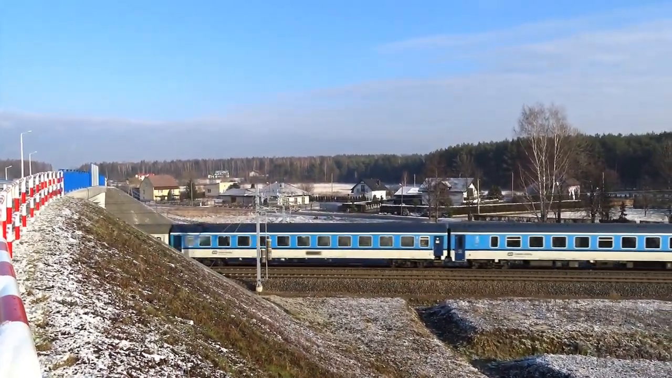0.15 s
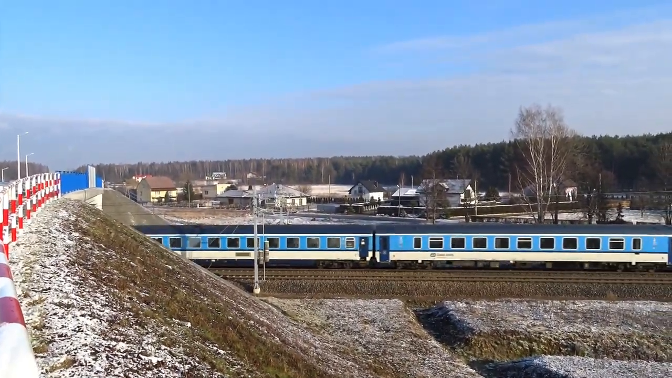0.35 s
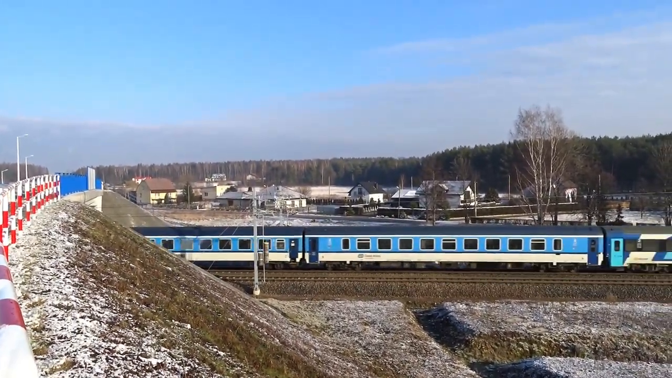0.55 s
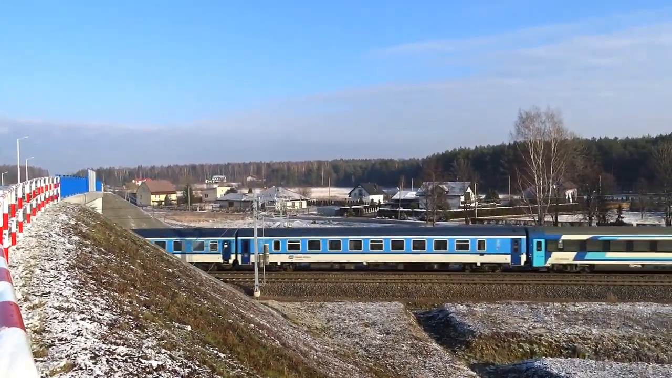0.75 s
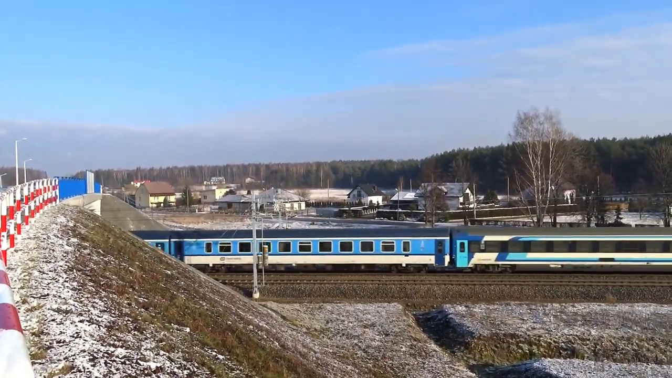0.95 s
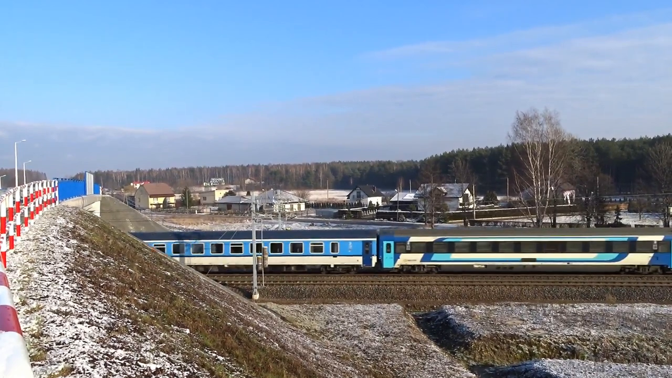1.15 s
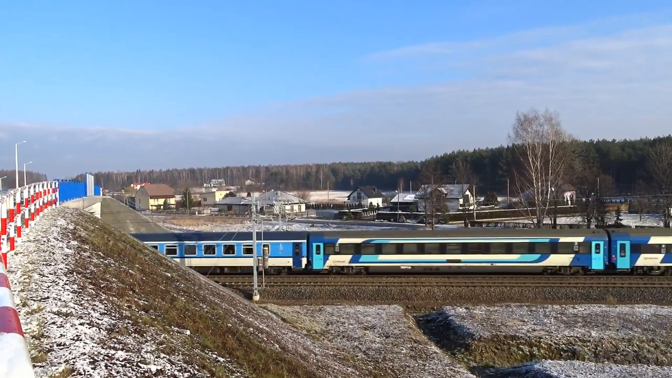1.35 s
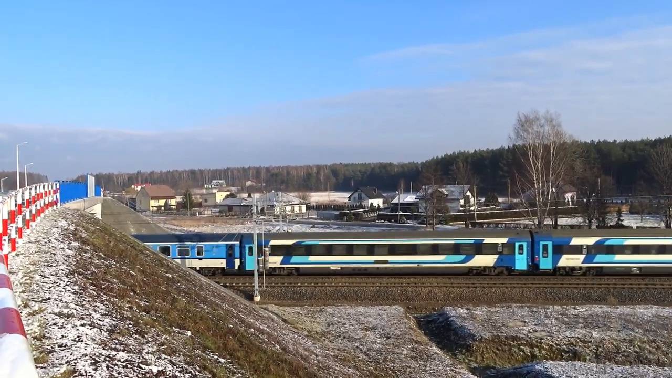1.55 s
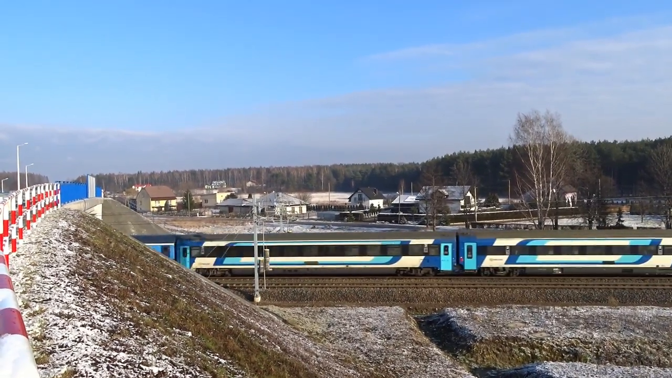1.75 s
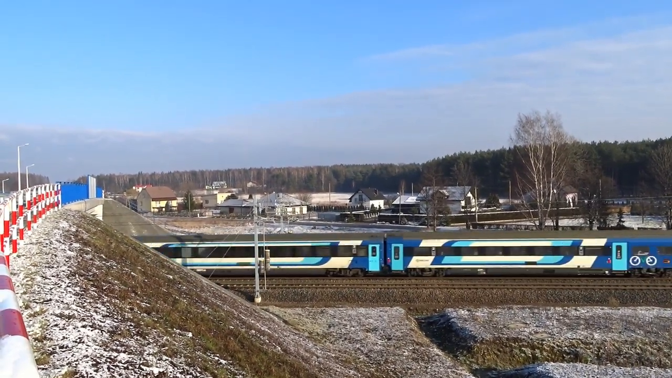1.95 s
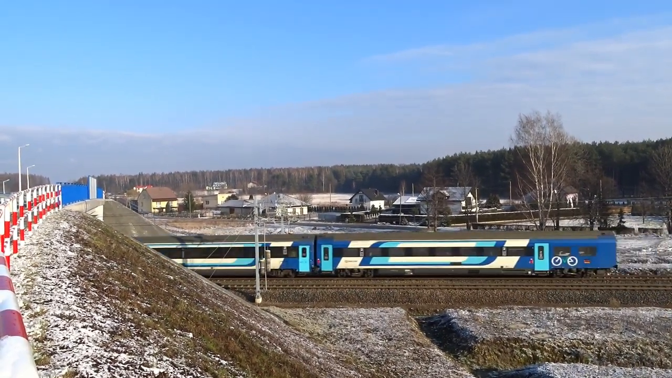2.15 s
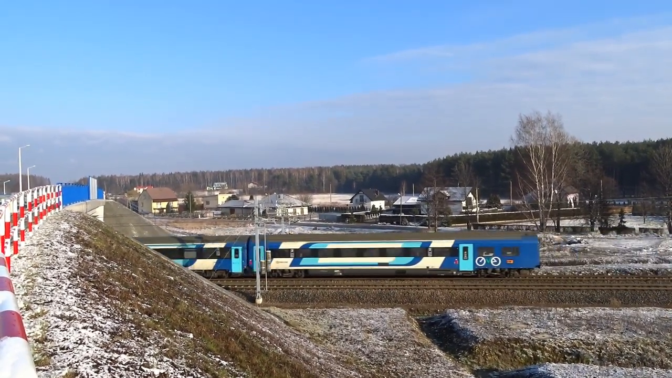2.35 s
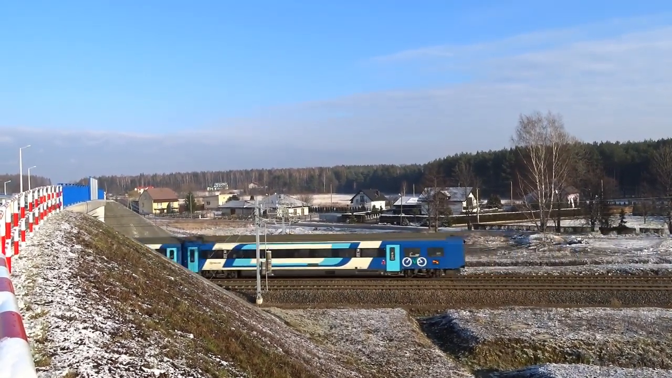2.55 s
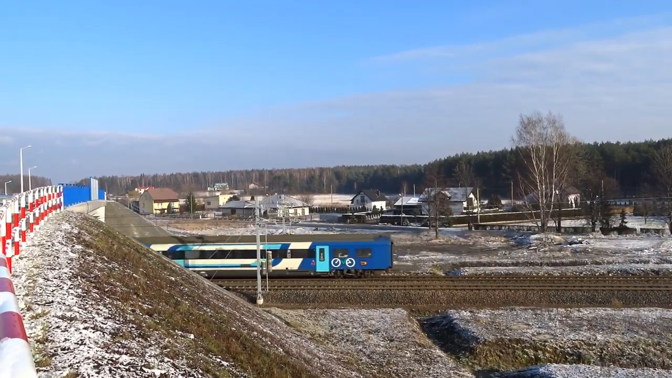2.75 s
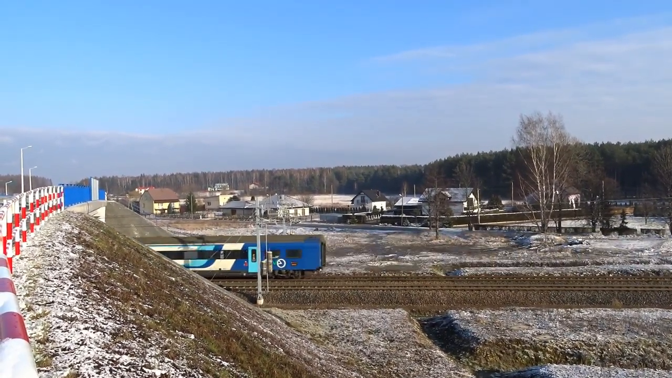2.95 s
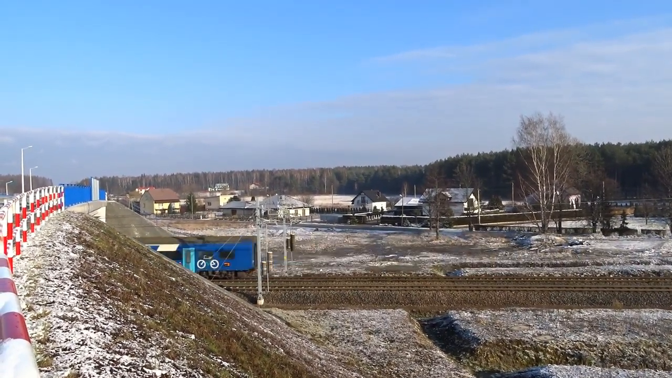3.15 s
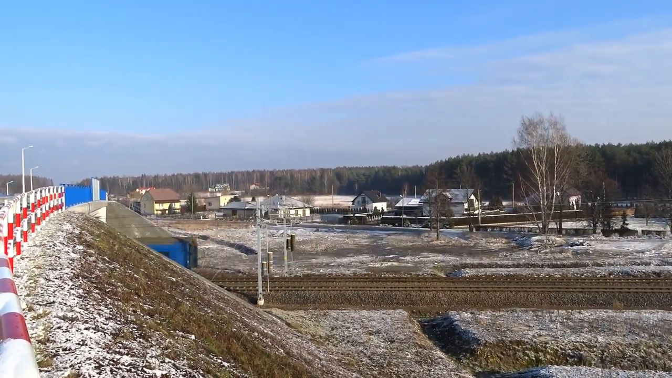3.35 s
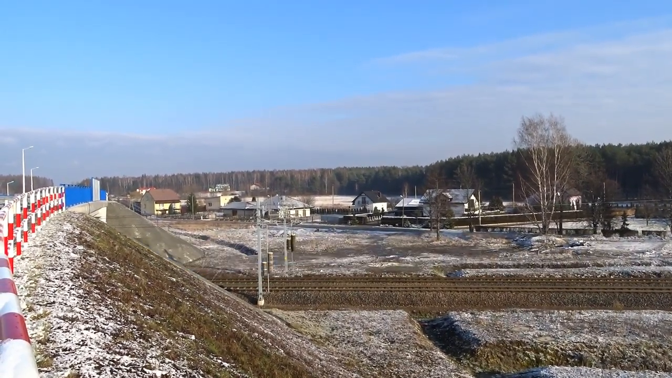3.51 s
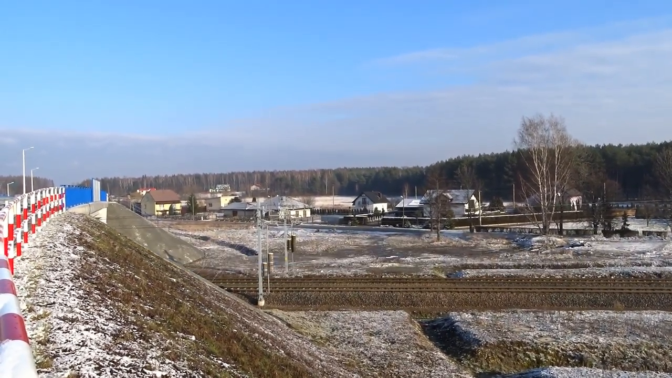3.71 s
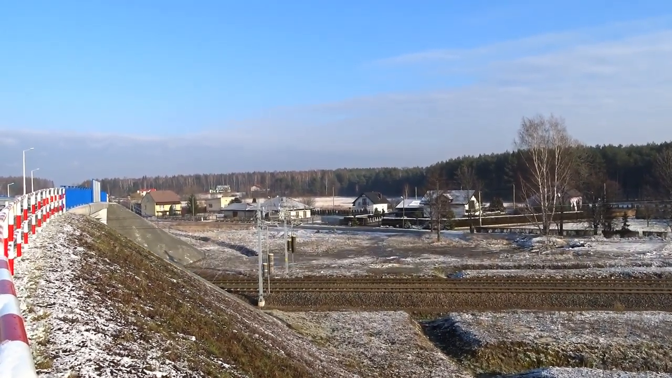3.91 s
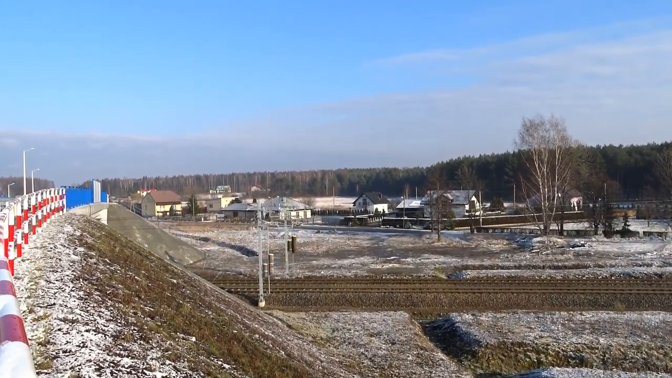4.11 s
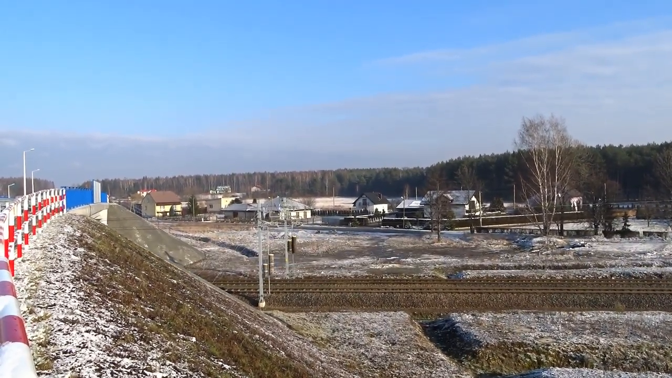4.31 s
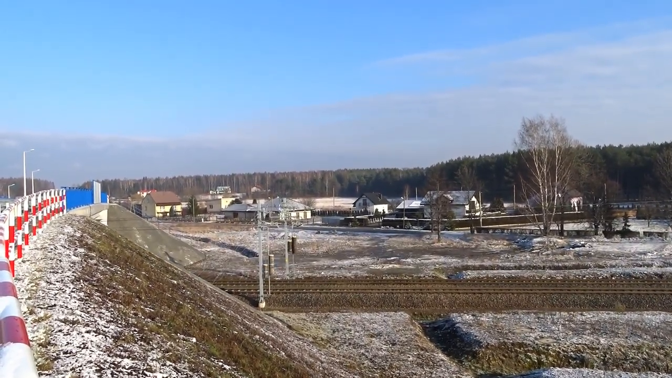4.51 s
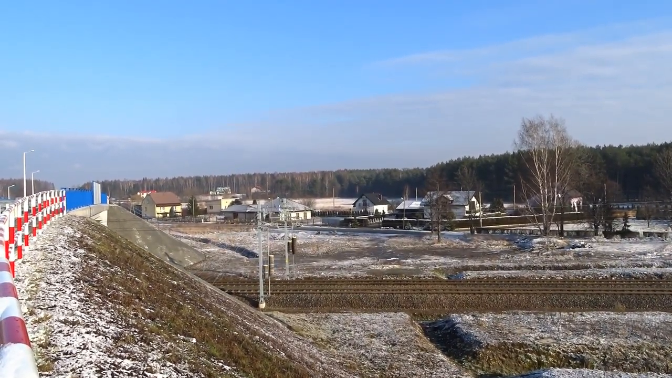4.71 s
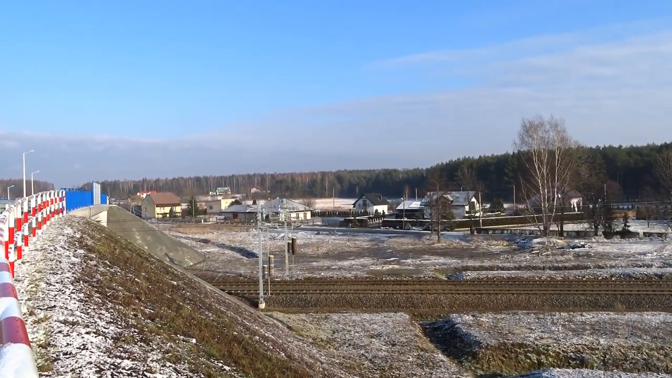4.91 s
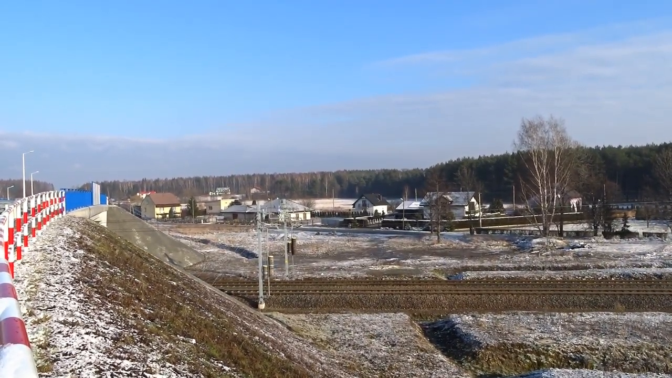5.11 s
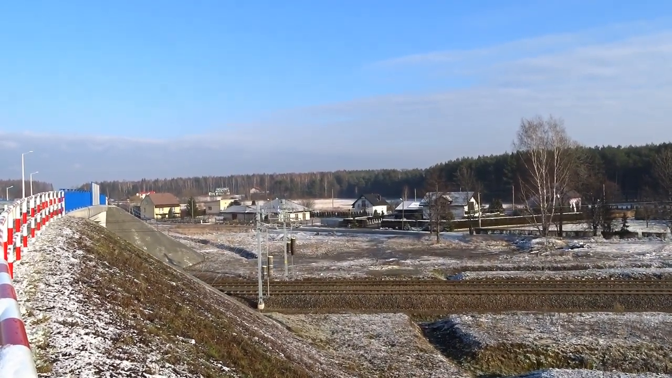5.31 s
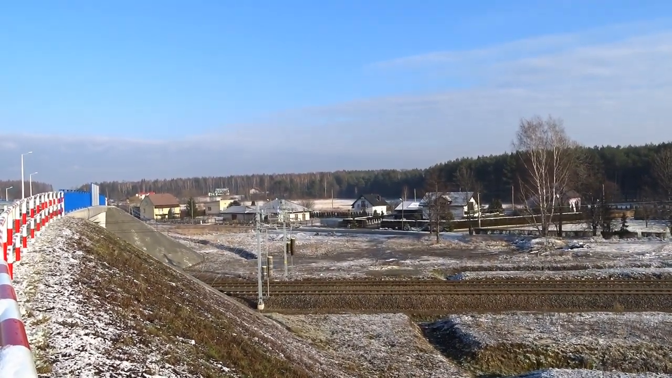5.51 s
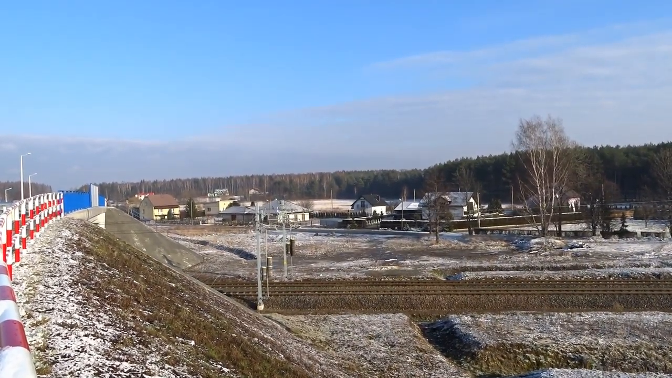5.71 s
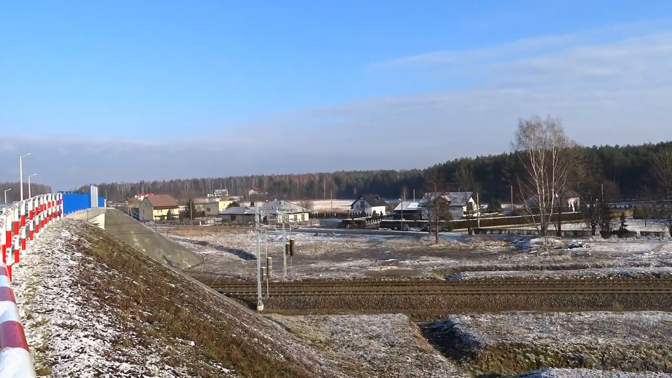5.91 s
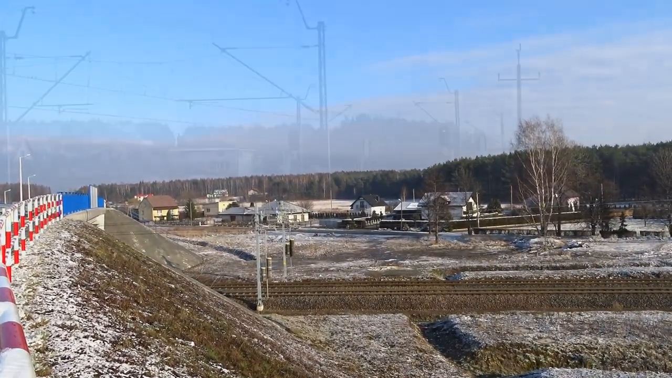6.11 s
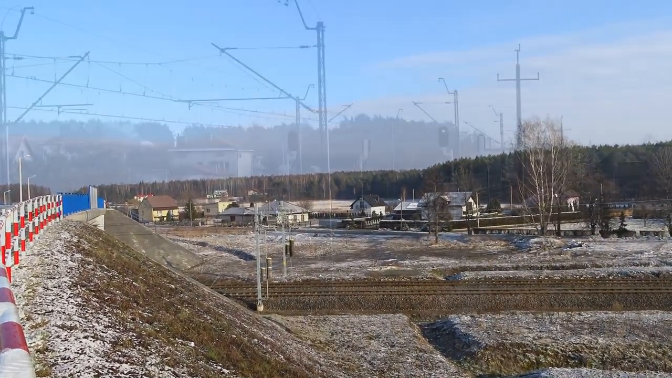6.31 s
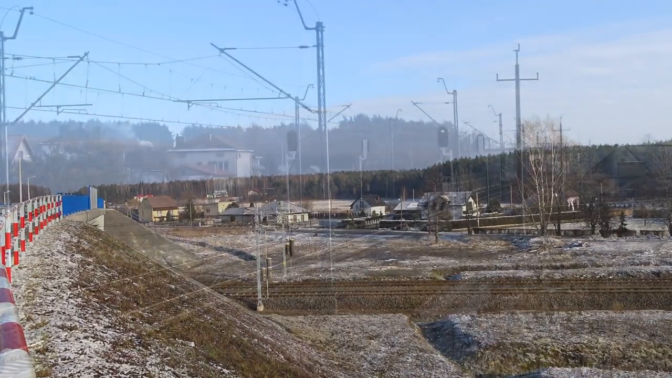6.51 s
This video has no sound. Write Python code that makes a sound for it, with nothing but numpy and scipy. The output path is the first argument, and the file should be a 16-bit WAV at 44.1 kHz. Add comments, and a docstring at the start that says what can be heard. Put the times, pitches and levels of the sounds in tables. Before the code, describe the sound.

Rough rolling roar of passing train coaches, wheels ringing and sinking in pitch, cuts to a dull distant wash with faintly singing rails.

```python
"""Express train passing below an embankment

The coaches of an express run past, right to left, and vanish behind a road bridge.
Rough steel roars (shaped noise); the wheels ring (resonant noise, sharp steel modes) and sink in
pitch as each bogie goes by; single wheels hum and howl (wavering tones).
Behind the last coach a dull wash recedes while the rails sing on in flares (narrow noise bands).
A few faint ticks and scuffs (noise bursts) sound near the microphone."""
import sys
import numpy as np
from scipy import signal
from scipy.fft import rfft, irfft, next_fast_len
from scipy.io import wavfile
from scipy.ndimage import uniform_filter1d, map_coordinates

SR = 44100
rng = np.random.default_rng(int(sys.argv[2]) if len(sys.argv) > 2 else 0)


def unload_wav(signal):
    """Save mono or channel-first audio to the path in sys.argv[1] as 16-bit WAV at rate SR, clipped to [-1, 1]."""
    wavfile.write(
        sys.argv[1],
        SR,
        np.round(np.clip(np.atleast_2d(signal).T, -1, 1) * 32767).astype(np.int16),
    )


N = 289320
T = np.arange(N) / SR
FRAME = 2048
HOP = FRAME // 4
HZ = np.fft.rfftfreq(FRAME, 1 / SR)
TIMES = np.arange(N // HOP + 3) * HOP / SR
GONE_S = 3.337  # the last bogie slips behind the bridge

# Spectra of track bed, rail roar, contact hiss and distant wash: f/Hz, relative level/dB
RUMBLE_SPECTRUM = [(12, -48), (25, -32), (50, -16), (90, -18), (125, -13.5), (160, -8), (200, -4),
                   (232, 0.5), (270, -4), (330, -6.5), (420, -10), (600, -31), (1200, -80)]
ROAR_SPECTRUM = [(160, -64), (280, -1), (331, -8), (361, -8.5), (423, -8.5), (751, 2.5), (1090, -4.5),
                 (1180, -3.5), (1390, -20), (1580, -8), (2100, -19), (2730, -45), (4620, -120)]
HISS_SPECTRUM = [(650, -26.5), (1100, -7), (1190, 0.5), (1390, -3), (1530, 3), (2070, -6.5), (2340, 0),
                 (2640, -7.5), (3450, -9), (3850, -15.5), (4920, -13.5), (5440, -20), (7250, -16.5),
                 (13200, -36.5), (15600, -44)]
FAR_SPECTRUM = [(25, -28), (60, -12), (110, -2.5), (150, -2), (300, -5.5), (430, -1), (520, -1.5),
                (700, -0.5), (830, -6), (1400, -6), (1650, -14.5), (1980, -15), (2170, -10), (2550, -15),
                (3300, -20.5), (3900, -25.5), (5200, -29.5), (6200, -46), (7150, -33), (8200, -50),
                (9600, -37), (12000, -38.5), (15700, -40)]
# Bogies at each coach end: loudest t/s, relative ring level/dB, wheel pitch/factor,
# damping/factor on mode width, roar surge/dB, sharp steel level/dB
BOGIES = [(0.1, -27.5, 0.96, 1.6, 0, -24), (.5, -27, 1.025, 2.3, .5, -27),
          (1.1, -24.5, 1.01, 0.67, .5, -27.5), (1.75, -24, 1.05, 1.4, 2, -26.5),
          (2.22, -22, 1.01, 1.14, 1, -29.5), (2.6, -21.5, 0.99, 0.6, 1.5, -25),
          (3.2, -21.5, 1, 0.72, 2.5, -27)]
# Modes of a rolling wheel: f/Hz, half width/Hz, relative level/dB
WHEEL_MODES = [(746, 90, -4), (1180, 25, -13), (1272, 59, -5.5), (1482, 37, -1), (1590, 100, -5.5),
               (1842, 102, -3.5), (2284, 100, -1.5), (2356, 77, -1), (2440, 70, -14), (2804, 55, -6.5),
               (2922, 77, -7.5), (3400, 47, -5.5), (3546, 116, -8.5), (4016, 61, -10), (4310, 88, -11),
               (4600, 150, -18), (4876, 53, -9), (5220, 120, -17.5), (5720, 170, -17.5), (6000, 64, -19.5),
               (6490, 140, -19), (7440, 120, -24.5), (8160, 280, -24)]
# Sharpest steel modes, each on one pitch: f/Hz, half width/Hz, relative level/dB
STEEL_MODES = [(736.5, 4, -1.5), (1204, 8, -3.5), (1476, 13, -3), (2314, 43, -5), (2339, 19, 1),
               (3464, 30, -9), (4980, 24, -16), (5990, 25, -17)]
# Hums of wheels on rippled rail: start t/s, end t/s, f/Hz, pitch spread/Hz, relative level/dB
HUMS = [(-.3, .3, 333, 7, -35), (.12, .5, 334, 5, -27), (.4, .76, 329, 6, -30.5), (-.1, .65, 259, 10, -35),
        (.25, .7, 298, 4, -36), (.55, 1.17, 290, 3, -31.5), (.53, 1.1, 255, 3, -22.5),
        (1.08, 1.3, 248, 5, -29), (1.2, 1.72, 246, 5, -30.5), (1.25, 1.68, 279, 4, -32),
        (1.6, 2.8, 258, 12, -36), (2.65, 3.25, 238, 9, -36)]
# Wheels that howl or squeal: start t/s, end t/s, f/Hz, pitch spread/Hz, relative level/dB
HOWLS = [(.25, .7, 770, 25, -30), (1.26, 1.41, 692, 22, -22.5), (1.15, 1.55, 595, 40, -29),
         (1.38, 1.68, 715, 45, -29), (1.55, 1.95, 850, 50, -31), (1.72, 1.98, 775, 16, -28),
         (1.9, 2.4, 760, 14, -32), (2.38, 2.79, 741, 5, -31), (3.0, 3.33, 740, 6, -32.5),
         (3.0, 3.5, 688, 10, -38), (3.3, 3.58, 733, 9, -38), (3.9, 4.55, 728, 22, -45.5),
         (.05, .4, 1205, 12, -33), (2.35, 2.68, 1170, 30, -32), (1.1, 1.6, 1675, 60, -31),
         (1.14, 1.48, 1595, 24, -29.5), (1.45, 2.35, 1540, 14, -33), (2.68, 3.0, 1580, 25, -30.5),
         (2.85, 3.25, 1860, 35, -35.5), (3.2, 3.5, 1477, 10, -31.5), (.25, 1.05, 2325, 28, -31),
         (.98, 1.32, 2342, 30, -29.5), (2.02, 2.66, 2345, 30, -29.5), (2.6, 2.82, 2305, 35, -29),
         (2.94, 3.38, 2355, 30, -28), (3.15, 3.42, 2295, 35, -28), (3.06, 3.36, 2962, 30, -32),
         (3.3, 3.52, 2925, 25, -43), (1.38, 2.02, 3675, 16, -35.5), (1.72, 1.84, 3660, 22, -35.5),
         (2.3, 2.62, 3680, 22, -38), (2.51, 2.62, 3540, 40, -29.5), (3.24, 3.42, 3450, 50, -36),
         (1.44, 1.7, 4905, 24, -34.5), (1.72, 1.92, 5080, 90, -41), (2.1, 2.54, 4915, 30, -37),
         (2.45, 2.7, 5210, 30, -41), (2.52, 2.72, 4020, 22, -34), (2.54, 2.68, 4290, 26, -36),
         (2.48, 2.8, 4440, 28, -37.5), (2.75, 3.18, 4760, 45, -41), (3.15, 3.25, 4355, 30, -33),
         (3.12, 3.27, 4035, 32, -37), (3.24, 3.46, 4315, 45, -47)]
# Drones of the receding train: start t/s, end t/s, f/Hz, pitch spread/Hz, relative level/dB
DRONES = [(2.8, 4.3, 231, 5, -39.5), (3.0, 5.0, 165, 14, -44), (4.22, 4.58, 229, 4, -36),
          (4.5, 5.45, 227, 6, -40.5), (2.9, 6.3, 199, 6, -42.5), (4.4, 7.4, 208, 5, -46),
          (2.8, 4.9, 294, 5, -46), (4.9, 6.7, 291, 5, -46), (4.7, 7.0, 615, 5, -49),
          (3.9, 5.5, 2310, 20, -54), (4.9, 7.2, 2090, 14, -52)]
# Bands the rail carries far: f/Hz, half width/Hz, relative level/dB
RAIL_BANDS = [(2140, 64, 4), (2250, 55, 5.5), (5650, 260, -1.5), (6670, 130, -2), (7010, 88, 0.5),
              (7220, 95, 3), (7400, 83, 2.5), (8170, 67, -7.5), (8860, 110, -5.5), (9580, 150, -8),
              (10430, 230, -12.5), (11300, 260, -15), (12030, 160, -13), (12850, 200, -13),
              (13550, 170, -18), (14350, 170, -24)]
# Flares of rail song, lower and upper bands by turns: t/s, gain/dB, f/Hz, half width/Hz
RAIL_FLARES = [(3.63, 6.5, 10400, 2500), (4.14, 5.5, 7200, 700), (4.57, 2, 10600, 2500),
               (4.72, 3, 7100, 700), (5.04, 5.5, 7200, 700), (5.3, 2.5, 6900, 1200), (5.36, 7, 10000, 2000),
               (5.88, 6, 7100, 700), (5.97, 8, 11000, 2500), (6.3, 7, 7100, 700)]
# Clicks and scuffs close by: t/s, peak level before panning/dB, f/Hz, width/Hz, decay/s
TICKS = [(5.480, -34, 620, 220, .02), (5.502, -36.5, 5400, 6500, .0023), (5.9585, -35, 7000, 5000, .0006),
         (5.9585, -37.5, 14800, 3000, .0006), (6.092, -35.5, 2500, 2000, .013),
         (6.123, -35, 2550, 2100, .009)]
# Left-right likeness at the two ports, passing train and distant wash: f/Hz, likeness/1
NEAR_LIKENESS = [(60, .998), (400, .99), (700, .965), (1200, .93), (2400, 0.96), (4400, .93), (8000, 0.96),
                 (12000, 0.995)]
FAR_LIKENESS = [(60, .998), (400, 1), (700, .93), (1100, .88), (1600, 0.88), (2200, 0.9), (3500, .78),
                (5000, .82), (7000, 0.91), (12000, 0.96)]
# Phase by which the left port leads: f/Hz, lead/rad
NEAR_LEAD = [(20, 0.13), (250, -0.35), (520, -0.64), (1030, -0.73), (2760, -0.38), (6370, -0.048),
             (15000, 0)]
FAR_LEAD = [(20, -.05), (250, -0.33), (1100, -0.8), (2000, -0.88), (3500, -.45), (6000, -.05), (15000, 0)]
# Passing train: f/Hz, share of the left-right balance/1
NEAR_BALANCE = [(100, 0), (700, 0.061), (1200, 1.5), (2000, 1.7), (3300, 1.4), (5500, 1.1), (9000, 1.3),
                (15000, 0.13)]
# Distant wash: f/Hz, left minus right at a turn of 1/dB
FAR_BALANCE = [(100, 0), (270, .5), (450, 3), (740, 3.5), (1220, 5), (1600, 7), (2100, 7), (3300, 2.5),
               (5500, 2), (9000, 0)]


def amp(db):
    """Decibels to gain."""
    return 10 ** (np.asarray(db) / 20)


def unit(x):
    """Scales to rms 1."""
    return x / np.sqrt(np.mean(x ** 2) + 1e-20)


def since(s, t=T):
    """Seconds elapsed after the moment s; zero before it."""
    return np.maximum(t - s, 0)


def spectrum(points):
    """Frequency table interpolated at every bin, on a log axis."""
    hz, value = np.transpose(points)
    return np.interp(np.log(HZ + 1), np.log(hz + 1), value)


def peaks(modes, damping=1):
    """Gain of a set of steep-sided resonances at every bin, summed in power."""
    power = 0
    for hz, width_hz, db in modes:
        detune = (HZ - hz) / (width_hz * damping)
        power = power + amp(db) ** 2 / (1 + detune ** 2) ** 2
    return np.sqrt(power)


def patches(count, size):
    """Random unevenness of rms 1, smooth over count frames and size bins."""
    z = rng.standard_normal((len(TIMES), len(HZ)))
    over_time = uniform_filter1d(z, count, axis=0)
    return unit(uniform_filter1d(over_time, size, axis=1))


def noise(gain):
    """Noise of rms 1 whose short-time spectrum follows gain."""
    a, b = rng.standard_normal((2, len(TIMES), len(HZ)))
    frames = ((a + 1j * b) * gain).T
    return unit(signal.istft(frames, nperseg=FRAME, noverlap=FRAME - HOP)[1][:N])


def wander(rate_hz, size=8192):
    """Slow random curve, rms 1, moving at up to about rate_hz."""
    hz = np.fft.rfftfreq(size, T[-1] / size)
    lowpass = 1 / (1 + (hz / rate_hz) ** 2)
    slow = unit(irfft(rfft(rng.standard_normal(size)) * lowpass, size))
    return np.interp(T, np.linspace(0, T[-1], size), slow)


def screen(depth_db, lag_s, over_s):
    """Gain behind the embankment: drops by depth_db just after the last bogie is hidden."""
    return amp(-depth_db / (1 + np.exp((GONE_S + lag_s - T) / over_s)))


def passage(hold_s, ease_db_per_s, recede_db_per_s):
    """Gain that holds while many coaches are near, eases as the tail comes, recedes once it is gone."""
    eased_db = ease_db_per_s * since(hold_s, np.minimum(T, GONE_S))
    return amp(-eased_db - recede_db_per_s * since(GONE_S))


def tones(rows, sink_per_s, waver, throb_db, steady_hz=12):
    """Tones that swell, fade, waver, throb and sink in pitch; the narrowest are the steadiest."""
    out = np.zeros(N)
    for start, end, centre_hz, width_hz, db in rows:
        on = (T > start) & (T < end)
        from_middle_s = T[on] - (start + end) / 2
        drift = wander(width_hz)[on]
        sinking_hz = centre_hz * (1 - sink_per_s * from_middle_s)
        hz = sinking_hz + waver * width_hz * (drift - drift.mean())
        throb = throb_db * min(width_hz / steady_hz, 1) * wander(2 * width_hz)[on]
        tone = unit(np.sin(2 * np.pi * np.cumsum(hz) / SR) * amp(throb))
        swell = np.cos(np.pi * from_middle_s / (end - start))
        out[on] += amp(db) * tone * swell
    return out


def rolling(rough_db=1.5, flutter_db=1.0, throb_db=1.5, grain_db=.8,
            rumble_db=-29.5, roar_db=-21.0, hiss_db=-23.5, turns_per_s=10.9, surge_s=.16):
    """Roughness shakes track bed (rumble), rails (roar) and contact patch (hiss).

    Roar and hiss surge under each bogie; out-of-round wheels throb the rumble once a turn.
    Only the rumble bends round the embankment."""
    turns = np.cumsum(turns_per_s * (1 + 0.05 * wander(2))) / SR
    throb = throb_db * np.sin(2 * np.pi * turns)
    surge = 0
    for s, _, _, _, db, _ in BOGIES:
        surge = surge + db * np.exp(-((T - s) / surge_s) ** 2)

    rumble = noise(amp(spectrum(RUMBLE_SPECTRUM))) * amp(rumble_db + throb)
    rumble *= passage(hold_s=1.3, ease_db_per_s=3.0, recede_db_per_s=3.0)

    roar = noise(amp(spectrum(ROAR_SPECTRUM) + rough_db * patches(count=9, size=5)))
    roar *= amp(roar_db + surge + grain_db * wander(30))
    roar *= passage(hold_s=1.23, ease_db_per_s=6.0, recede_db_per_s=9.5)
    roar *= screen(depth_db=3.5, lag_s=.05, over_s=.06)

    hiss = noise(amp(spectrum(HISS_SPECTRUM) + rough_db * patches(count=7, size=10)))
    hiss *= amp(hiss_db + surge + flutter_db * wander(29))
    hiss *= passage(hold_s=2.47, ease_db_per_s=7.5, recede_db_per_s=9.5)
    hiss *= screen(depth_db=8.0, lag_s=0.16, over_s=0.071)
    return rumble + roar + hiss


def wheels(passing_s=0.39, doppler=0.017, uneven_db=4.0, level_db=-25.0):
    """Each bogie swells and fades, its wheel modes sliding down as it turns from coming to going."""
    power = 0
    for s, db, pitch, damping, _, _ in BOGIES:
        along = (TIMES[:, None] - s) / passing_s
        distance = np.sqrt(1 + along ** 2)
        shift = pitch * (1 - doppler * along / distance)
        ring = np.interp(HZ / shift, HZ, peaks(WHEEL_MODES, damping)) / np.sqrt(damping)
        power = power + (amp(db) * ring / distance ** 2) ** 2  # a wheel radiates mostly sideways
    ringing = noise(np.sqrt(power) * amp(uneven_db * patches(count=12, size=2)))
    return amp(level_db) * ringing * screen(depth_db=12.0, lag_s=.12, over_s=0.058)


def steel(blur=.008, passing_s=0.11):
    """Lightly damped modes ring as narrow fuzzy lines, swelling with each bogie.

    Many wheels passing at once make the pitch unsteady: a wandering clock reads the ring."""
    size = next_fast_len(N)
    hz = np.fft.rfftfreq(size, 1 / SR)
    gain = 0
    for centre_hz, width_hz, db in STEEL_MODES:
        gain = gain + amp(db) / np.sqrt(width_hz) / (1 + ((hz - centre_hz) / width_hz) ** 2)
    ring = irfft(rfft(rng.standard_normal(size)) * gain, size)
    crowded = np.clip(1 - T / 2.51, 0, 1)  # fades as the last coach comes
    clock = np.cumsum(1 + blur * crowded * wander(11.97))
    blurred = unit(map_coordinates(ring, [clock], order=3, mode="wrap"))
    power = 0
    for s, _, _, _, _, db in BOGIES:
        power = power + amp(db) ** 2 / (1 + ((T - s) / passing_s) ** 2)
    return blurred * np.sqrt(power) * screen(depth_db=11.5, lag_s=0.086, over_s=0.065)


def howls(hum_db=.5, howl_db=0.6, drone_db=-0.7, sink_per_s=.045, settled_per_s=.005):
    """Worn wheels hum low and squeal higher up, sinking as they pass; far off, drones barely sink."""
    hum = tones(HUMS, sink_per_s, waver=.35, throb_db=4.5)
    howl = tones(HOWLS, sink_per_s, waver=.45, throb_db=3.8)
    drone = tones(DRONES, settled_per_s, waver=.3, throb_db=6)
    return amp(hum_db) * hum + amp(howl_db) * howl + amp(drone_db) * drone


def rails(shimmer_db=3.0, swell_db=1.0, level_db=-39, flare_s=0.11):
    """Rails carry narrow treble bands from the wheels, singing on in flares behind the train."""
    flares = 0
    for s, db, hz, width_hz in RAIL_FLARES:
        in_time = np.exp(-((TIMES - s) / flare_s) ** 2)
        in_band = np.exp(-((HZ - hz) / width_hz) ** 2)
        flares = flares + db * np.outer(in_time, in_band)
    song = noise(peaks(RAIL_BANDS) * amp(flares + shimmer_db * patches(count=12, size=4)))
    song *= amp(level_db + swell_db * wander(8))
    return song * passage(hold_s=2.86, ease_db_per_s=2.0, recede_db_per_s=6.5)


def ticks():
    """Short noise bursts: the briefest click, the longer ones swell softly and scuff."""
    out = np.zeros(N)
    for s, db, hz, width_hz, decay_s in TICKS:
        envelope = np.sqrt(since(s)) * np.exp(-since(s) / decay_s)
        burst = noise(peaks([(hz, width_hz / 2, 0)])) * envelope
        out += amp(db) * burst / abs(burst).max()
    return out


def far_train(drift_db=1.06, level_db=-35.5, early_db=-9.0, emerge_s=0.23,
              recede_db_per_s=1.54, treble_db_per_s=1.0):
    """A drifting wash, low at first, emerges at the bridge and recedes; its treble lingers longest."""
    linger = treble_db_per_s * np.outer(since(GONE_S, TIMES) - 1.4, np.minimum(HZ / 6000, 1))
    wash = noise(amp(spectrum(FAR_SPECTRUM) + linger + drift_db * patches(count=16, size=3)))
    emerge = early_db * np.exp(-since(GONE_S) / emerge_s)
    return wash * amp(level_db + emerge - recede_db_per_s * since(GONE_S))


def ports(x, likeness, lead, balance, turn):
    """Two close microphone ports hear nearly the same sound; turn scales the balance over time."""
    _, t, z = signal.stft(x, SR, nperseg=FRAME, noverlap=FRAME - HOP)
    balance_db = np.outer(spectrum(balance), np.interp(t, T, turn))
    tilt = amp(balance_db / 2) * np.exp(.5j * spectrum(lead))[:, None]  # half to each port
    same = np.clip(spectrum(likeness), 0, 1)[:, None]
    a, b = rng.standard_normal((2, *z.shape))
    scatter = np.sqrt(2 * (1 - same) / (1 + same)) * (a + 1j * b)
    pair = z * np.array([tilt + scatter, 1 / tilt - scatter])
    return signal.istft(pair, nperseg=FRAME, noverlap=FRAME - HOP)[1][:, :N]


def scene(pan_db=-1.23, turn_s=1.66, pan_db_per_s=0.9, far_turn=0.82, far_turn_per_s=0.16):
    """The train crosses from right to left; its distant wash arrives diffusely from the left."""
    near = rolling() + wheels() + steel() + howls() + rails() + ticks()
    # Left minus right: steady while coaches fill the view, then following the tail
    crossing = pan_db + pan_db_per_s * since(turn_s, np.minimum(T, GONE_S))
    leaving = far_turn + far_turn_per_s * since(GONE_S)
    passing = ports(near, NEAR_LIKENESS, NEAR_LEAD, NEAR_BALANCE, crossing)
    distant = ports(far_train(), FAR_LIKENESS, FAR_LEAD, FAR_BALANCE, leaving)
    return passing + distant


def record(dry, fade_s=5.85, fade_db_per_s=5.5, edge_hz=15750):
    """Closing fade and the recorder's band limit."""
    faded = dry * amp(-fade_db_per_s * since(fade_s))
    lowpass = signal.firwin(511, edge_hz, window=("kaiser", 9), fs=SR)
    return signal.oaconvolve(faded, lowpass[None], "same")


dry = scene()
out = record(dry)
unload_wav(out)
```